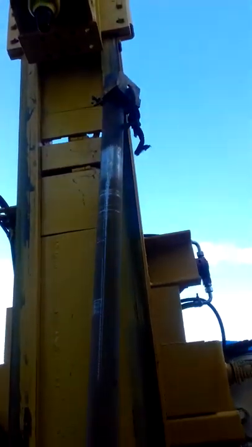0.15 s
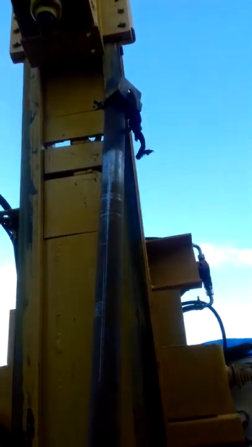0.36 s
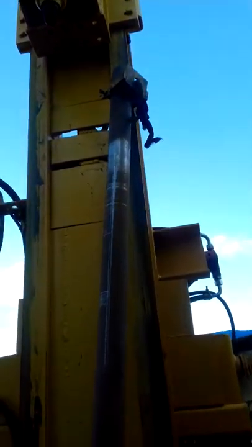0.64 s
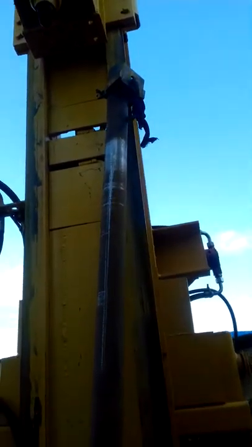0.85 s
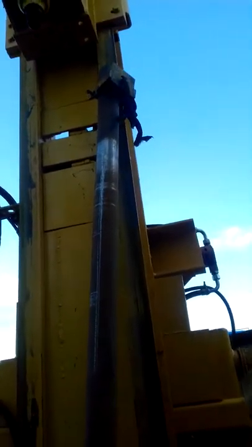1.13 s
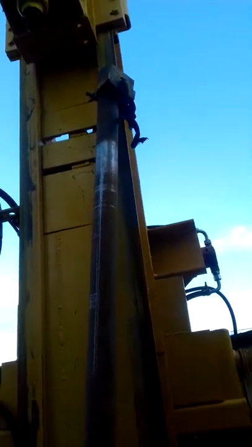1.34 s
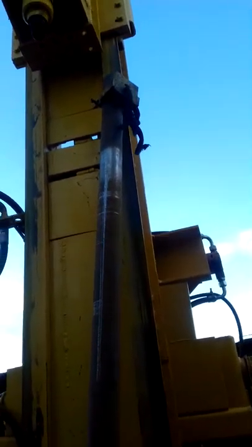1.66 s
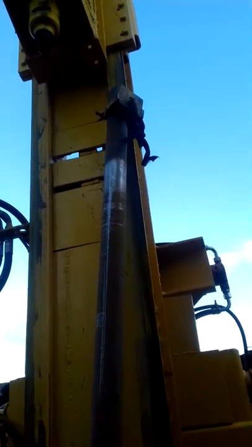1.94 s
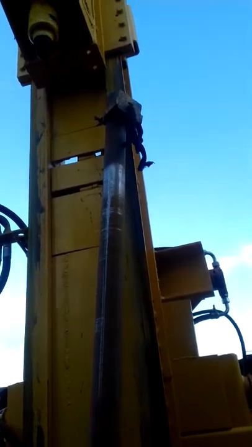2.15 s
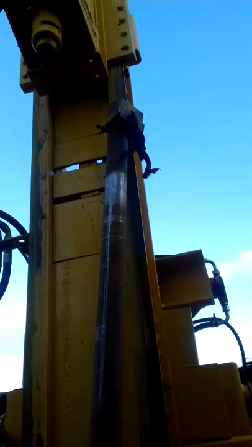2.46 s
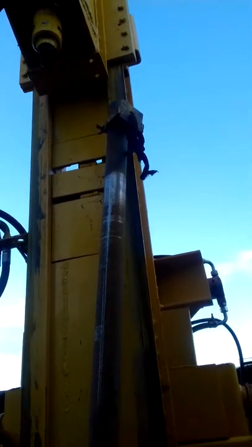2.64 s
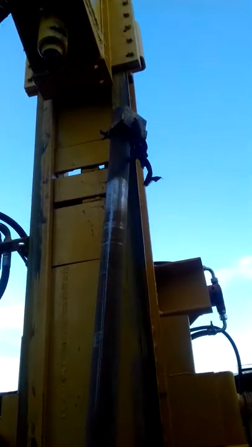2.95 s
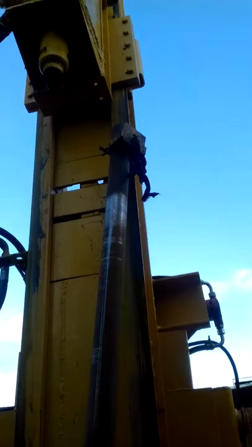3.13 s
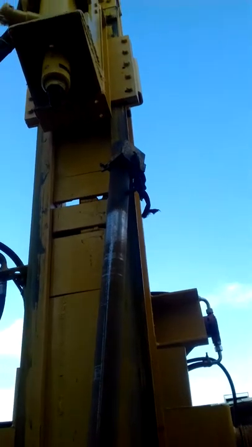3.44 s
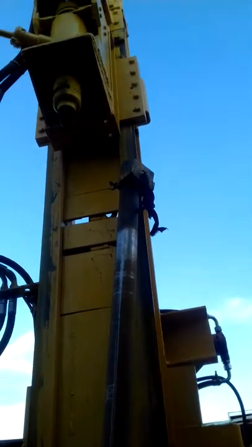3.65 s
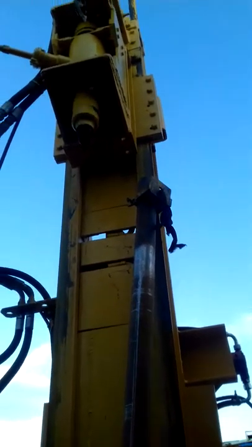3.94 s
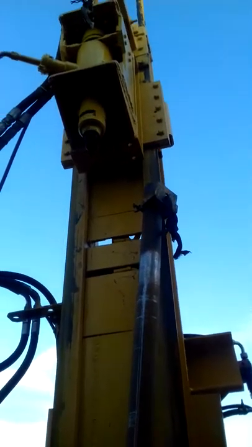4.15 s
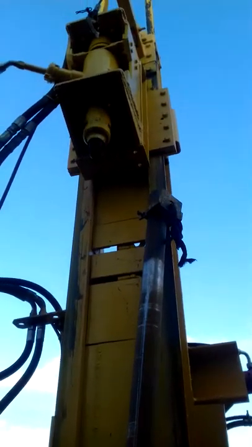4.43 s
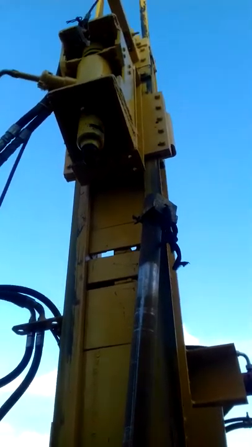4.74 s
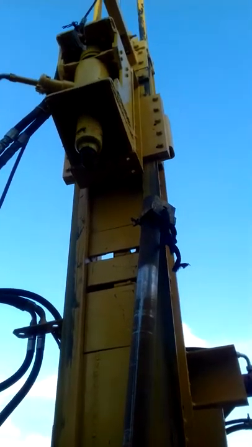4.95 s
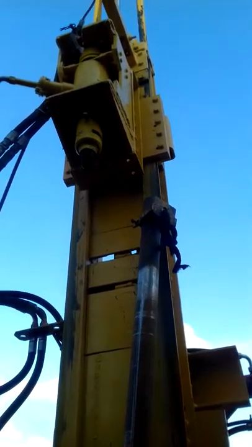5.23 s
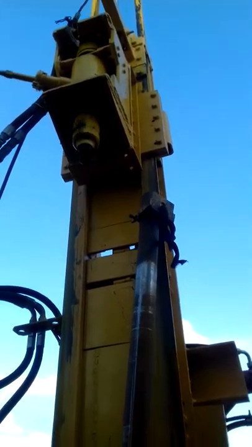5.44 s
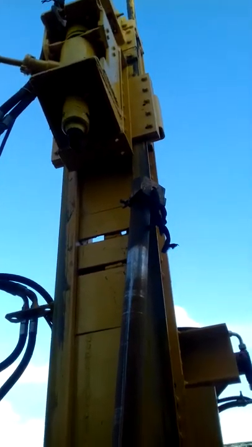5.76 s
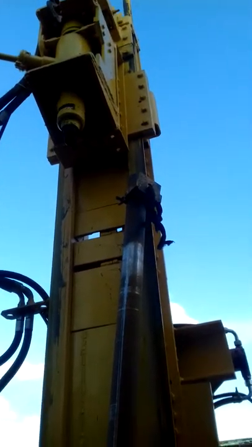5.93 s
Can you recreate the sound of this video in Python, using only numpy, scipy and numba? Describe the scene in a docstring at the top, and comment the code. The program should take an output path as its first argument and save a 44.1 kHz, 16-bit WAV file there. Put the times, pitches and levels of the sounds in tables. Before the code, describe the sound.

From 0 to about 6 seconds a large eight-cylinder diesel on a drilling rig runs at an unchanging, fairly fast speed, heard close from the foot of the mast outdoors. The firing fuses into a buzzing drone of about 88 Hz, covered by dense, hard knocking and loose-steel rattle, strongest around 1.5 to 2.5 kHz. A hydraulic pump whines steadily at several pitches, fan air rushes, and a thin valve hiss lies on top. Wind thumps and flutters low on the microphone, strongest from 0.1 to 0.6 seconds, again near 0.9 to 1.1 and 1.6 to 1.9, then dies away. From 1 to 4.5 seconds singing metallic overtones around 1.6 kHz swell and shift; the cover's ring slides slightly as the hand-held microphone moves. One faint low wind thump comes near 5.1 seconds. The engine continues to the end without slowing.

```python
"""The eight-cylinder diesel of a drilling rig holds about 1325 rpm outdoors, heard from the foot of the mast.
Harmonic sines give its exhaust drone; repeating decaying noise, coloured by the block, gives its knock.
A hydraulic pump whines in sines, a cover and a panel resonate, and shaped noise makes fan, rattle and hiss.
Levels shift as the hand-held microphone drifts through the rig's reflections.
Wind buffets it mostly in the first two seconds, with one faint thump after five."""
import sys
import numpy as np
from scipy import signal
from scipy.fft import rfft, irfft, next_fast_len
from scipy.io import wavfile
from scipy.ndimage import uniform_filter1d
from numba import njit

SR = 44100
rng = np.random.default_rng(int(sys.argv[2]) if len(sys.argv) > 2 else 0)


def store_pcm(level_fs):
    """Save levels as 16-bit WAV."""
    pcm = np.round(np.clip(level_fs, -1, 1) * 32767).astype(np.int16)
    wavfile.write(sys.argv[1], SR, np.atleast_2d(pcm).T)


N = 268567


def amp(db):
    """Logarithmic level: decibels to amplitude gain."""
    return 10 ** (np.asarray(db) / 20)


def unit(x):
    """Normalisation by effective value: scale to rms 1."""
    return x / np.sqrt(np.mean(x ** 2))


def curves(table):
    """Linear interpolation: the columns of a time table, one value a sample."""
    t, *columns = np.transpose(table)
    return [np.interp(np.arange(N) / SR, t, column) for column in columns]


def colour(x, spectrum):
    """Linear filtering: give a white signal of rms 1 a spectral density of (f/Hz, level/dB per Hz) points."""
    hz, db = np.transpose(spectrum)
    size = next_fast_len(N)
    f = np.maximum(np.fft.rfftfreq(size, 1 / SR), 1)
    gain = amp(np.interp(np.log(f), np.log(hz), db))
    # white noise of rms 1 spreads its power over SR / 2 hertz
    return irfft(rfft(x, size) * gain, size)[:N] * np.sqrt(SR / 2)


@njit
def resonate(x, hz, width):
    """Damped resonance: a state-variable band-pass whose centre may move every sample."""
    y, band, low = np.empty(len(x)), 0., 0.
    for i in range(len(x)):
        g = np.tan(np.pi * hz[i] / SR)
        damping = width / hz[i]
        v = (band + g * (x[i] - low)) / (1 + g * (g + damping))
        band = 2 * v - band
        low = low + 2 * g * v
        y[i] = damping * v
    return y


def ring(x, hz, width_hz):
    """Cascaded resonance: two equal band-passes in series give steep sides."""
    return resonate(resonate(x, hz, width_hz), hz, width_hz)


def walk(rate):
    """Slow random modulation: levels held 1 / rate s, smoothed twice by a moving average, rms 1."""
    hold = int(SR / rate)
    held = np.repeat(rng.standard_normal(N // hold + 1), hold)
    slewed = uniform_filter1d(uniform_filter1d(held, hold), hold)
    return unit(slewed[:N])


def tone(cycles, order):
    """Phase locking: a sine of rms 1 at a fixed multiple of the engine cycle, with a random phase."""
    return np.sqrt(2) * np.sin(2 * np.pi * (order * cycles + rng.random()))


def swell(middle_s, spread_s):
    """Gaussian envelope: a bell-shaped rise and fall of peak 1; spread_s is its standard deviation."""
    return np.exp(-.5 * ((np.arange(N) / SR - middle_s) / spread_s) ** 2)


def turbulence(edge_hz, low_hz=120, order=4):
    """Turbulent pressure on the port: noise dull above its edge, thinned in the bass by the microphone."""
    low_pass = signal.butter(order, edge_hz, fs=SR, output="sos")
    high_pass = signal.butter(order - 2, low_hz, "high", fs=SR, output="sos")
    dull = signal.sosfilt(low_pass, rng.standard_normal(N))
    return unit(signal.sosfilt(high_pass, dull))


# gusts of wind: middle t/s, level/dB, standard deviation of the envelope t/s
WIND_GUSTS = [(0.162, -18.5, 0.035), (.3, -23.5, .06), (0.43, -23, .035), (0.537, -27, 0.044),
              (0.955, -25, 0.12), (1.587, -27, 0.066), (1.877, -26.5, .06), (2.09, -33, .05)]
# strongest eddies that strike the microphone: t/s, peak level of the envelope/dB, f/Hz
WIND_EDDIES = [(.118, -18, 150), (.153, -6, 650), (.159, -8, 160), (0.179, -10, 300), (.185, -7, 263),
               (.274, -7, 520), (.279, -19, 90), (.291, -10, 338), (0.336, -15, 270), (.36, -8, 523),
               (.388, -13, 400), (.413, -13, 282), (.429, -8, 360), (.439, -13, 282), (.517, -14, 170),
               (.545, -16, 210), (0.569, -14, 220), (.742, -19, 260), (0.876, -13, 198), (.893, -10, 165),
               (.97, -13.5, 240), (.99, -16, 119), (1.023, -17, 230), (1.089, -19, 280), (1.564, -21, 220),
               (1.58, -16.5, 180), (1.654, -18, 300), (1.742, -12, 197), (1.835, -17, 230),
               (1.851, -14, 141), (1.892, -13, 149), (5.149, -24, 160)]


def wind(buffet_db=-2.0, eddy_turns=0.51):
    """Wind-induced pressure: gusts rumble unevenly; each strong eddy thumps with a swing or two."""
    gusts = sum(amp(db) * swell(s, spread_s) for s, db, spread_s in WIND_GUSTS)
    out = gusts * unit(turbulence(edge_hz=400) * amp(buffet_db * walk(45)))
    t = np.arange(N) / SR
    for s, db, hz in WIND_EDDIES:
        swing = np.sin(2 * np.pi * (hz * (t - s) + rng.random()))
        out = out + amp(db) * swell(s, eddy_turns / hz) * swing
    return out


def rush(flicker_db=0.96):
    """Broadband turbulence: white noise of rms 1 whose level flickers a little."""
    return unit(rng.standard_normal(N) * amp(flicker_db * walk(6.6)))


# spectrum of the hiss of oil and air in the valves: f/Hz, level/dB per Hz
HISS_SPECTRUM = [(3000, -79.5), (4900, -70), (5600, -72.5), (6200, -69.5), (6700, -80), (7900, -82.5),
                 (8400, -88), (9100, -90), (9950, -102), (10500, -96.5), (12500, -107), (15000, -114)]
# gain of the hiss as the microphone tilts up the mast: t/s, level/dB
HISS_GAIN = [(0, -.5), (2, 0), (4.8, 0), (6.09, 1)]


def valve_hiss():
    """Flow noise: turbulence of oil and air in the valves, strongest between 4.5 and 6.5 kHz,
    with a faint even rush below."""
    return colour(rush(), HISS_SPECTRUM) * amp(curves(HISS_GAIN)[0])


def rattle(cycles, decay=0.51, uneven_db=0.5, count=16):
    """Repeated impact: loose steel chatters twice per firing, unevenly; decay is in chatter periods."""
    beat, since = np.divmod(cycles * count, 1)
    strengths = amp(uneven_db * rng.standard_normal(int(beat[-1]) + 1))
    strength = strengths[beat.astype(int)]
    return unit(rng.standard_normal(N) * strength * np.exp(-since / decay))


# spectrum of the fan's rush and loose rattle together: f/Hz, level/dB per Hz
FAN_SPECTRUM = [(20, -104), (70, -81), (120, -73), (165, -65), (250, -64), (330, -62.5), (450, -65),
                (600, -64), (780, -60), (1100, -57.5), (1600, -52.5), (2100, -57), (2600, -54.5),
                (2900, -66.5), (3300, -67.5), (3700, -61.5), (4550, -60), (5200, -72), (9000, -125)]


def fan(cycles):
    """Aerodynamic noise with impacts: the fan's rush and the loose rattle share one spectrum."""
    return colour(unit(rush() + 0.57 * rattle(cycles)), FAN_SPECTRUM)


# ring of a smaller panel as the microphone moves: t/s, centre f/Hz, level/dB
PANEL_RING = [(0, 2400, -30.5), (1, 2394, -29), (2, 2410, -33.5), (3, 2420, -31.5), (3.9, 2466, -30),
              (5, 2520, -34), (6.09, 2483, -28.5)]


def panel(knocks, width_hz=105.0, loose=0.61):
    """Forced resonance: a smaller panel rings thinly under the knocks and a flickering rush."""
    hz, db = curves(PANEL_RING)
    return amp(db) * unit(ring(knocks + loose * rush(), hz, width_hz))


# ring of the steel cover as the microphone moves: t/s, centre f/Hz, level/dB
COVER_RING = [(0, 1530, -33), (.9, 1685, -28), (1.3, 1663, -23.5), (2.6, 1630, -27.5), (3.2, 1595, -32),
              (3.7, 1526, -27), (4.4, 1567, -27.5), (6.09, 1530, -25)]


def cover(cycles, knocks, width_hz=217.0, loose=0.93):
    """Forced resonance: a steel cover rings under the knocks and the rattle."""
    hz, db = curves(COVER_RING)
    return amp(db) * unit(ring(knocks + loose * rattle(cycles), hz, width_hz))


# pump tones: multiples of the engine cycle, twelve strokes a turn and two octaves above
STROKE_ORDERS = [24, 48, 96]
# the three tones in their standing waves: t/s, low level/dB, middle level/dB, high level/dB
WHINE_LEVELS = [(0, -33, -33.5, -29), (1, -34, -28.5, -29.5), (1.4, -34, -31.5, -35.5),
                (2.7, -36, -31, -33), (3.6, -30.5, -29.5, -33), (4.3, -31, -31.5, -33.5),
                (4.9, -31, -31.5, -28.5), (6.09, -33, -32.5, -28.5)]
# faint high overtones of the pump: f/Hz, level of each/dB
OVERTONE_LEVELS = [(3700, -46.5), (4400, -46), (5500, -53), (8000, -68.5), (9300, -72)]


def pump(cycles, flutter_db=0.74):
    """Harmonic series of the strokes: the whine flutters with oil pressure; high overtones come and go."""
    whine = sum(tone(cycles, order) * amp(db + flutter_db * walk(14))
                for order, db in zip(STROKE_ORDERS, curves(WHINE_LEVELS)))
    mean_cycle_hz = cycles[-1] * SR / N
    stroke_hz = STROKE_ORDERS[0] * mean_cycle_hz
    hz, db = np.transpose(OVERTONE_LEVELS)
    first, last = round(hz[0] / stroke_hz), round(hz[-1] / stroke_hz)
    edge = 0
    for k in np.arange(first, last + 1):
        level_db = np.interp(k * stroke_hz, hz, db) + 3.6 * walk(1.6)
        edge = edge + tone(cycles, k * STROKE_ORDERS[0]) * amp(level_db)
    return whine + edge


# overtones near a crest of their standing wave: multiple of the engine cycle,
# level before the mix gain/dB, start t/s, end t/s
STANDING_WAVES = [(99, -37, 3, 4.5), (120, -36, 0, 2.2), (120, -31, 4.4, 6.2), (127, -34, 4.5, 5.6),
                  (136, -30, 0, 1), (136, -29.5, 3.2, 5), (141, -32.5, 3.4, 5.8), (143, -33, 4.6, 6.2),
                  (144, -27.5, 1, 4.5), (145, -31, 1.2, 3.4), (146, -32, .2, 1.2), (146, -29.5, 4.8, 6.2),
                  (150, -27, 1.2, 2.7), (153, -31.5, 1.2, 3.3), (156, -34, 2.4, 3.4), (160, -32, 1.3, 2.7),
                  (161, -29, .9, 3.2), (174, -34, 1.3, 3), (200, -37, 2.3, 3.9), (213, -35, 0, 1)]


def singing(cycles, fade_s=0.49, flutter_db=1.65, waver_rad=0.27, flutter_rate=14.0):
    """Standing waves: engine and pump overtones swell near their crests, each with its own flutter."""
    t, out = np.arange(N) / SR, 0
    for order, db, start_s, end_s in STANDING_WAVES:
        near = np.clip(.5 + np.minimum(t - start_s, end_s - t) / fade_s, 0, 1)
        # phase waver in radians, turned into engine cycles
        waver = waver_rad * walk(flutter_rate) / (2 * np.pi * order)
        out = out + near * tone(cycles + waver, order) * amp(db + flutter_db * walk(flutter_rate))
    return out


def knock_cycle(decay, uneven_db, size=4096, count=8):
    """Impulsive excitation: each cylinder's noise burst decays slowly, decay in firing intervals."""
    cylinder, since = np.divmod(np.arange(size) * count / size, 1)
    strength = amp(uneven_db * rng.standard_normal(count))[cylinder.astype(int)]
    bursts = rng.standard_normal(size) * strength * np.exp(-since / decay)
    overtones = rfft(bursts)[:size // 4]
    # the block's many overlapping modes even out the overtones
    evened = overtones / np.abs(overtones) ** 0.1
    return unit(irfft(evened, size * count))


def knocking(cycles, count=9):
    """Periodicity: knocks repeat every cycle; the pattern changes slowly between listening places."""
    place, out = np.linspace(0, count - 1, N), 0
    for k in range(count):
        wave = knock_cycle(decay=16.0, uneven_db=1.46)
        nearness = np.cos(np.pi / 2 * np.clip(place - k, -1, 1))
        out = out + nearness * np.interp(cycles % 1, np.linspace(0, 1, len(wave)), wave)
    return out


# spectrum of the combustion knock: f/Hz, level/dB per Hz
KNOCK_SPECTRUM = [(40, -92), (110, -65), (190, -66.5), (420, -63.5), (720, -60.5), (1100, -60), (1400, -54),
                  (1650, -51), (2100, -57), (2550, -57), (2750, -61.5), (3200, -70.5), (4300, -64),
                  (5300, -74), (8300, -93.5), (11000, -125)]


def block_knock(cycles):
    """Structure-borne sound: the block colours the repeating combustion knocks."""
    return colour(knocking(cycles), KNOCK_SPECTRUM)


# exhaust and frame tones, with one pump overtone (216): multiple of the two-turn engine cycle (multiples of 8
# are firing tones), # level before the mix gain/dB
DRONE_TONES = [(4, -53), (8, -33.5), (12, -46.5), (14, -47), (16, -37.5), (18, -44), (19, -46.5), (21, -47),
               (28, -42), (34, -45.5), (36, -41), (37, -39), (40, -45.5), (45, -46), (46, -46), (47, -46),
               (50, -42.5), (52, -46), (65, -43), (69, -40.5), (70, -41.5), (72, -40), (76, -44),
               (80, -43.5), (81, -42), (88, -41.5), (97, -44), (101, -44), (107, -43), (113, -41),
               (121, -41), (127, -38), (128, -33.5), (182, -41), (216, -38)]


def drone(cycles, sway_db=2.5):
    """Harmonic series with interference: shorter waves sway more as the microphone moves."""
    top = DRONE_TONES[-1][0]
    out = 0
    for order, db in DRONE_TONES:
        sway = sway_db * np.sqrt(order / top) * walk(1.89)
        out = out + tone(cycles, round(order)) * amp(db + sway)
    return out


RPM = 1325.3  # crankshaft speed, revolutions a minute


def crank():
    """Phase as integrated frequency: two-turn engine cycles so far; the governor hunts a little."""
    hunting = .0004 * walk(2) + .0005 * walk(12)
    cycle_hz = RPM / 120 * (1 + hunting)
    return np.cumsum(cycle_hz) / SR


def scene():
    """Superposition: the engine and pump tones, knocks and rattle follow one crankshaft, amid air and wind."""
    cycles = crank()
    frame_knocks = knocking(cycles)
    steel = cover(cycles, frame_knocks) + panel(frame_knocks)
    air = fan(cycles) + valve_hiss()
    tones = amp(0.37) * drone(cycles) + pump(cycles) + amp(0.7) * singing(cycles)
    mix = tones + block_knock(cycles) + steel + air + wind()
    return mix[None]


TOP_HZ = 15000  # upper limit of the microphone


def record(dry):
    """Band limitation: the microphone cuts the top with a steep elliptic low-pass."""
    return signal.sosfilt(signal.ellip(8, .2, 70, TOP_HZ, fs=SR, output="sos"), dry)


dry = scene()
out = record(dry)
store_pcm(out)
```